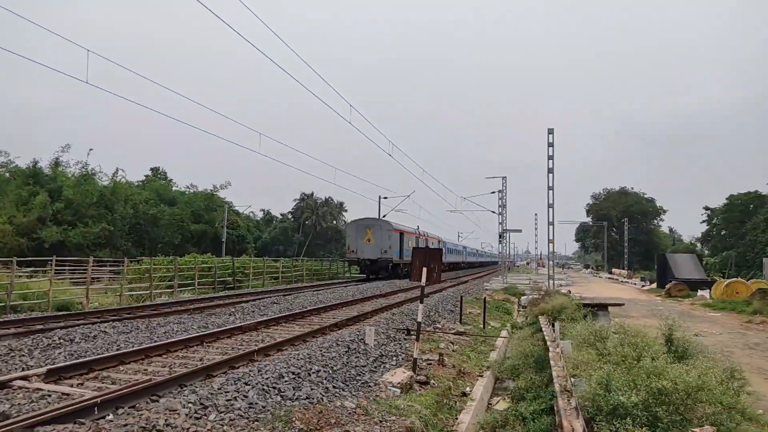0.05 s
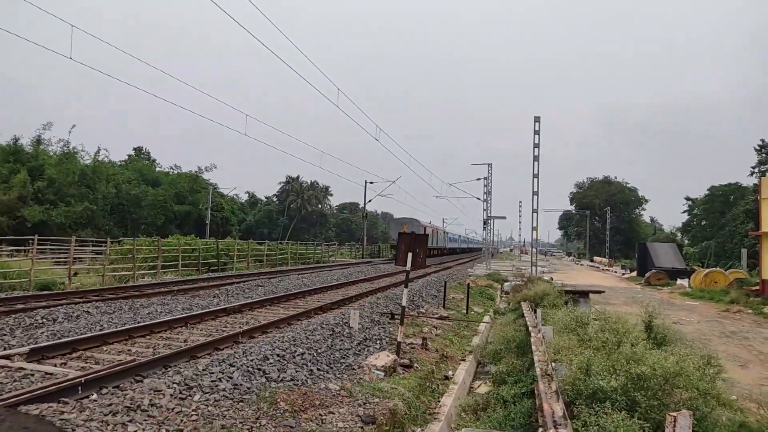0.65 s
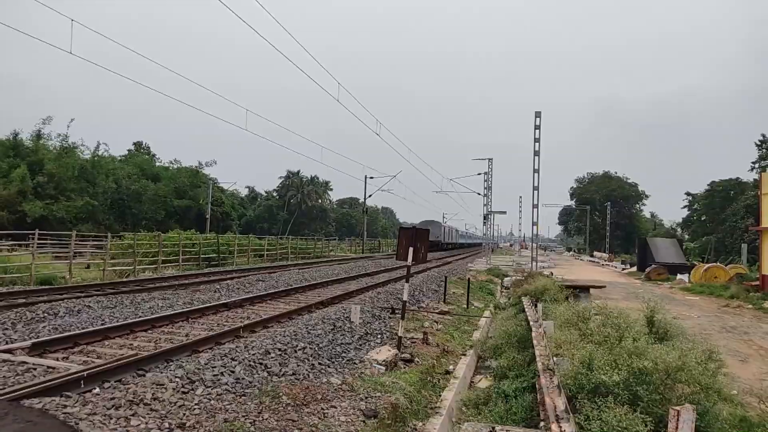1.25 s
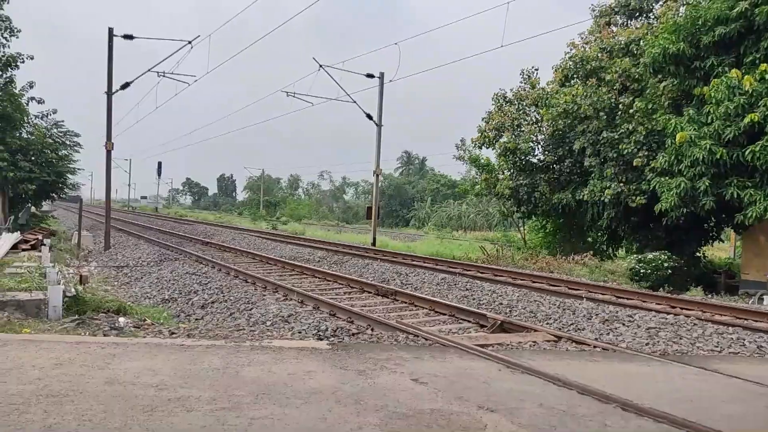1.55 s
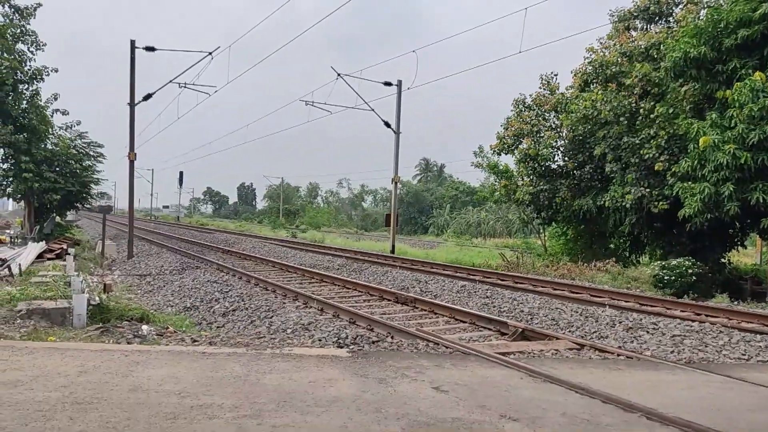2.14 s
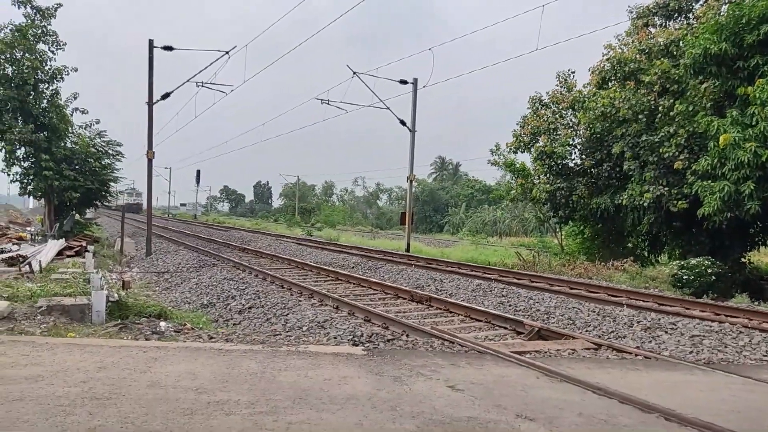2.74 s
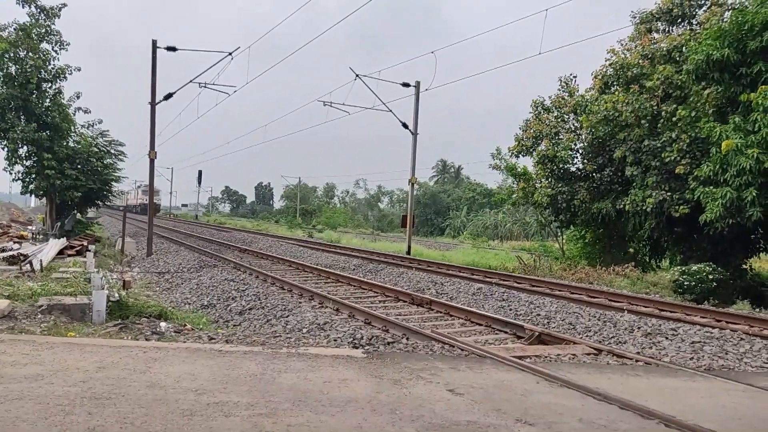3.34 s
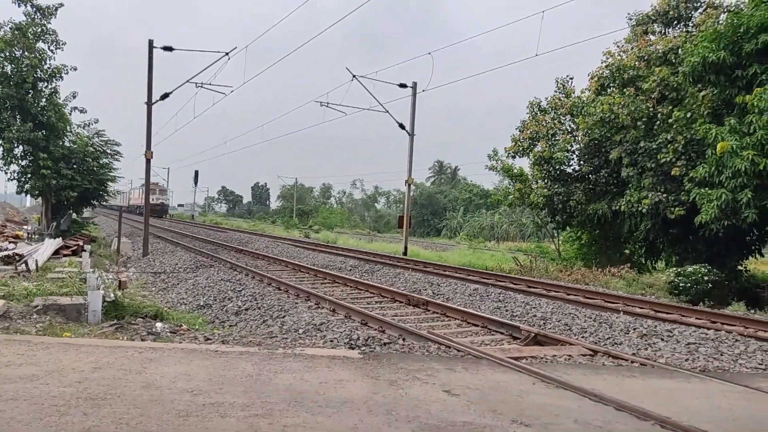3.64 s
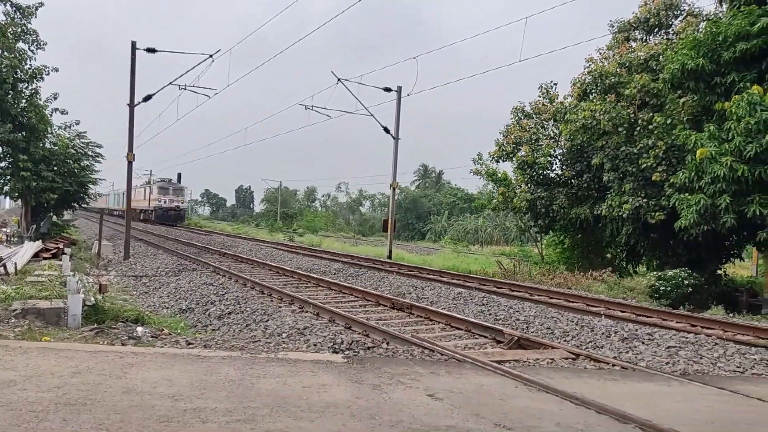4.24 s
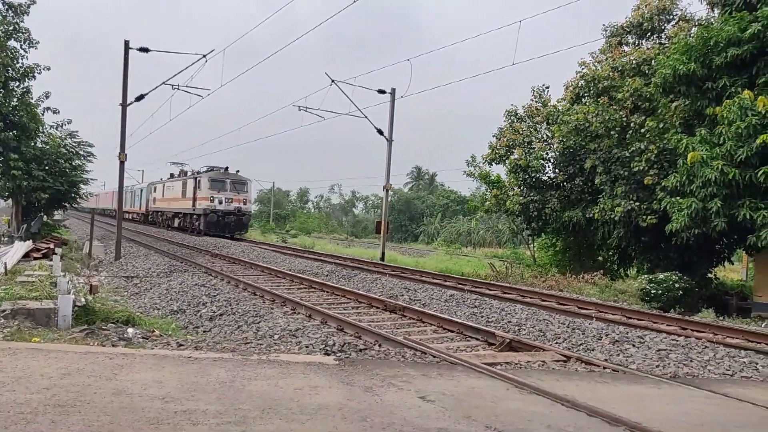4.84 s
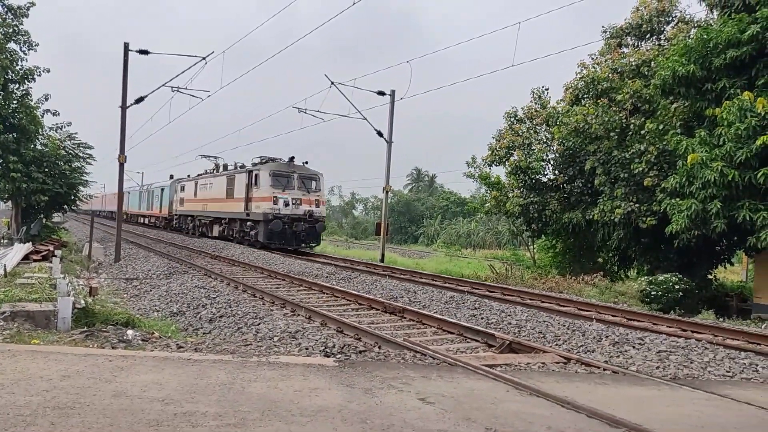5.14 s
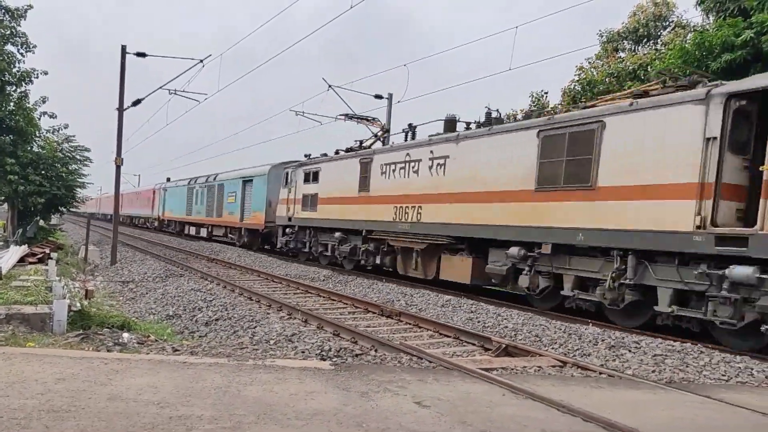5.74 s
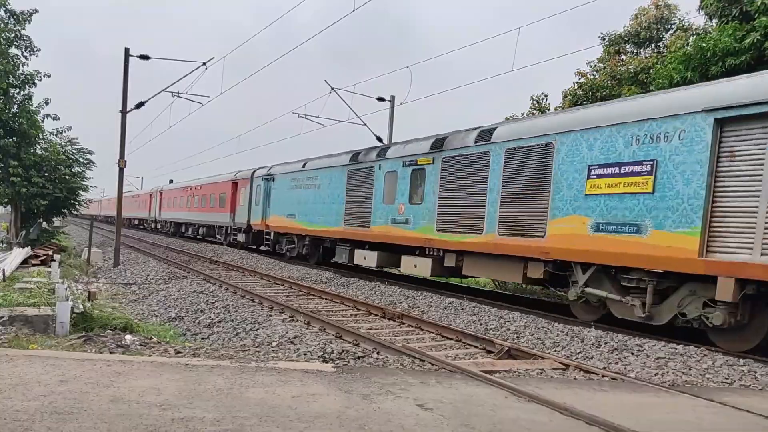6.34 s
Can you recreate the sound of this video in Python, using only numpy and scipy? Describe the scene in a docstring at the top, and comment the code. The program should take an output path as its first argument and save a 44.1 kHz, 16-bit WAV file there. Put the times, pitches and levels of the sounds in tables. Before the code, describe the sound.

Beside the tracks in open country, a phone microphone picks up the soft rolling of a departing train and a faint far horn. After an abrupt break, an oncoming locomotive blows a single bright horn note for about three seconds, swelling as it nears. The horn ends and the wheel noise builds to a loud roar, with a throbbing hum, whining gears and quick clattering over the crossing.

```python
"""An express train sounds one long horn blast, then roars and clatters past a level crossing.
Before it, another train rolls away under a faint far horn, and a short silence follows. Compressed air
drives each horn's diaphragm in a harmonic series; rough wheels force the ground, track and rails into
resonance. The oncoming train's speed and distance set its level, direction and Doppler shift.
The sound is heard through the two microphone ports of a phone."""
import sys
import numpy as np
from scipy import signal
from scipy.fft import rfft, irfft
from scipy.io import wavfile
from scipy.ndimage import uniform_filter1d, minimum_filter1d, map_coordinates

SR = 44100
rng = np.random.default_rng(int(sys.argv[2]) if len(sys.argv) > 2 else 0)


def output_pcm(signal):
    """Save a mono or channel-first signal as 16-bit PCM at the path in sys.argv[1].

    Samples are clipped to [-1, 1] before scaling.
    """
    pcm = np.clip(np.atleast_2d(signal).T, -1, 1) * 32767
    wavfile.write(sys.argv[1], SR, np.round(pcm).astype(np.int16))


N = 281358
TIME = np.arange(N) / SR
FREQ = np.fft.rfftfreq(N, 1 / SR)
HOP = 128  # samples per step of the horns' control curves

# The leaving train's roll and hiss. Each row: frequency in Hz, relative spectral density in dB.
LEAVING_ROLL_SPECTRUM = [(25, 0.5), (52, 6), (90, -2.5), (130, -5), (220, -2), (320, -8.5), (550, -4.5),
                         (900, -6.5), (1250, -12.5), (1680, -7.5), (1850, -10.5), (2200, -9.5), (3000, -24),
                         (8000, -22)]
LEAVING_HISS_SPECTRUM = [(1200, -11), (2500, 4), (3200, 2), (4200, 8), (5500, -10.5), (7700, -17.5),
                         (10000, -3), (12000, -46), (15000, -24)]
# The far horn fades and swells over its long path.
# Each row: time in seconds, levels of harmonics 2, 3, 4 and 5 in dB.
FAR_HORN_HARMONICS = [(0, -45, -49, -48, -44), (.16, -38, -44, -53, -40), (.3, -56, -45, -58, -47),
                      (.42, -51, -58, -58, -40), (.5, -59, -42, -58, -49), (.6, -56, -34, -49, -40.5),
                      (.72, -39, -44.5, -41.5, -51), (.88, -57, -41.5, -44, -55), (1.0, -43, -49, -40, -53),
                      (1.1, -43, -47, -49, -46), (1.2, -39.5, -45, -51, -43), (1.35, -40, -40, -55, -38.5),
                      (1.5, -49, -40.5, -49, -52)]
# The open air's rumble. Each row: frequency in Hz, relative spectral density in dB.
OPEN_AIR_SPECTRUM = [(20, 9.5), (55, -4.5), (90, -9), (160, 1), (260, -38), (450, -25), (900, -29.5)]
# Brief swells of that rumble. Each row: peak time in seconds, half-width in seconds, level in dB.
RUMBLE_SWELLS = [(1.76, .04, -52), (2.07, 0.085, -42), (2.87, 0.055, -45), (3.05, 0.043, -48),
                 (3.55, .04, -48.5)]
# The swells' two bands. Each row: centre in Hz, width in Hz, relative gain in dB.
RUMBLE_BANDS = [(68, 25, 0), (150, 40, -5)]
# The near horn's note. Each row: time in seconds, pitch in Hz.
HORN_NOTE = [(1.56, 361.7), (1.65, 357.6), (1.8, 357.1), (2.1, 362.2), (2.31, 360.5), (3.3, 356.0),
             (3.48, 358.5), (3.7, 356.5), (4.38, 355.8)]
# Its harmonics at full blast. Each row: frequency in Hz, relative level in dB.
HORN_SPECTRUM = [(358, -12.5), (716, -9.5), (1074, -3.5), (1432, -11), (1790, -4), (2148, -18.5),
                 (2506, -14), (2864, -14.5), (3222, -22), (3580, -16), (3940, -22.5), (4280, -18),
                 (4640, -13), (5000, -18), (5350, -17.5), (5800, -21.5), (7900, -21), (11000, -21.5),
                 (15000, -24)]
# The blast as it carries through the air.
# Each row: time in seconds, relative levels of the body, the bite (2-6 kHz) and the treble in dB.
HORN_BANDS = [(1.56, -42, -40, -46), (1.58, -39, -35.5, -42), (1.68, -33, -35, -35.5),
              (1.95, -32.5, -37, -34), (1.98, -36.5, -39.5, -35), (2.17, -36, -40, -43.5),
              (2.39, -29.5, -37.5, -31), (2.58, -31, -30, -34), (2.64, -30.5, -30, -32),
              (2.8, -28.5, -28.5, -28.5), (2.95, -25.5, -30, -29.5), (3.12, -19, -23.5, -30.5),
              (3.17, -19.5, -26.5, -27), (3.23, -17.5, -24, -30.5), (3.4, -19, -25.5, -24.5),
              (3.59, -14.5, -19.5, -22), (3.84, -16.5, -28, -23), (3.97, -13.5, -25.5, -21),
              (4.11, -13.5, -23, -21), (4.39, -13.5, -18.5, -20), (4.5, -19, -23.5, -22)]
# The ground's reflection cancels and lifts harmonics 1 and 2; harmonic 3 surges at entry, then sags.
# Each row: time in seconds, relative level in dB.
HORN_FIRST = [(1.56, -40), (1.76, -39), (1.84, -54), (1.92, -37), (2.0, -48.5), (2.1, -39.5), (2.52, -38),
              (2.6, -46), (2.68, -35), (2.85, -37.5), (3.0, -30), (3.17, -28), (3.25, -39.5), (3.32, -28),
              (3.4, -34), (3.52, -26.5), (3.85, -24), (4.2, -15), (4.48, -15), (4.65, -17.5)]
HORN_SECOND = [(1.56, -36.5), (1.64, -37.5), (1.7, -42.5), (2.37, -33.5), (2.6, -34), (2.71, -41.5),
               (3.24, -27), (3.51, -26.5), (3.55, -20.5), (3.81, -24.5), (3.94, -18.5), (4.62, -18.5)]
HORN_THIRD = [(1.56, -35), (1.73, -28), (1.94, -39), (1.97, -41), (2.06, -39), (2.2, -43), (2.35, -34),
              (2.5, -31), (2.82, -29), (3.2, -17.5), (3.43, -22), (3.55, -15.5), (3.77, -16.5), (4.25, -10),
              (4.5, -18.5)]
# Compressed air leaving the horn. Each row: frequency in Hz, relative spectral density in dB.
RUSH_SPECTRUM = [(500, -52), (850, 12.5), (1250, -5), (1650, -39), (3000, -48), (6000, -38), (7900, 3),
                 (12000, -22)]
# Its surges and dips. Each row: peak time in seconds, half-width in seconds, level change in dB.
RUSH_GUSTS = [(3.66, 0.026, -3), (3.745, 0.021, 11), (3.98, 0.01, -4), (4.2, 0.053, 9)]
# Resonances driven by the wheels. Each row: centre in Hz, width in Hz, relative gain in dB.
GROUND_MODES = [(53.5, 19, 1.5), (32.2, 19, -7), (104, 13, -11.5), (150, 8.5, -7.5)]
TRACK_MODES = [(213, 28, -15), (290, 73, -3.5), (192, 29, 0), (320, 63, -3.5), (420, 42, -66)]
RAIL_MODES = [(755, 220, 11), (668, 200, 6), (910, 140, 4.5), (987, 94, -18), (1710, 53, -8)]
# The oncoming wheels' hiss. Each row: frequency in Hz, relative spectral density in dB.
WHEEL_HISS_SPECTRUM = [(500, -12), (1000, 3.5), (1250, -5.5), (1450, 1), (1850, 0.5), (2500, -4.5),
                       (4000, -6), (5500, -11), (7700, -10.5), (10000, -11), (15000, -15)]
# The ballast's reflection hollows out the rolling sound. Each row: frequency in Hz, gain in dB.
BALLAST_RESPONSE = [(370, -1.5), (450, -1.5), (550, -5), (640, -1.5), (720, 0)]
# The locomotive's drone and gear whine. Each row: time in seconds, level in dB.
DRONE_ENVELOPE = [(4.5, -47), (5.2, -40), (5.5, -29.5), (5.62, -32), (5.8, -21.5), (6.0, -22),
                  (6.38, -20.5)]
WHINE_ENVELOPE = [(4.7, -61), (5.0, -47), (5.2, -36), (5.38, -40), (5.48, -25.5), (5.6, -31), (5.69, -23),
                  (5.8, -26.5), (5.95, -18), (6.1, -27), (6.38, -27)]
# Axles striking the crossing. Each row: start in seconds, relative level in dB.
AXLE_BLOWS = [(5.47, -13), (5.599, -12), (5.682, -11), (5.747, -3.5), (5.811, -7), (5.866, -12),
              (5.936, -11), (5.958, -7), (6.056, -9), (6.122, -7.5), (6.16, -3), (6.205, -14),
              (6.253, -19.5), (6.306, -11)]
# Steel knocks in the running gear. Each row: start in seconds, level in dB.
STEEL_KNOCKS = [(5.812, -29), (5.885, -31), (5.918, -27), (5.938, -24), (5.951, -23), (5.99, -25),
                (6.02, -16), (6.054, -32), (6.262, -14), (6.324, -8)]
# Passing bogies. Each row: peak time in seconds, half-width in seconds, level in dB, ring pitch in Hz.
BOGIE_PASSES = [(5.93, 0.026, -19, 1850), (6.31, 0.069, -21, 1850)]
# The two ports' responses. Each row: frequency in Hz, gain in dB.
LEFT_RESPONSE = [(60, -3), (380, 3.5), (720, 3), (1200, 3), (4500, 1.3), (5800, 5), (6600, -9), (7700, -6),
                 (8600, -21), (10000, -24), (15000, -22.5)]
RIGHT_RESPONSE = [(60, -7.5), (380, 1.04), (720, 4), (1200, 2), (4500, -0.6), (6500, 6), (7700, 13),
                  (8600, 4.5), (10000, -12.5), (12000, -15), (15000, -19.5)]

LEAVING_END_S, HORN_ON_S, SPLICE_S, VALVE_SHUTS_S, HORN_OFF_S = 1.5, 1.549, 2.319, 4.525, 4.88
RELEASE_DB_PER_S, TREBLE_RELEASE_DB_PER_S, RELEASE_DB_PER_S2 = 51.5, 197, 327
SPEED_M_S, SOUND_M_S, TRACK_DISTANCE_M = 36, 343, 8
FRONT_PASSES_S, GEARS_PASS_S, WHEELS_PASS_S = 5.944, 6.03, 6.058


def undb(db):
    """Amplitude grows tenfold for every 20 dB."""
    return 10 ** (np.asarray(db) / 20)


def unit(x):
    """Normalisation to an rms of 1."""
    return x / np.sqrt(np.mean(x ** 2))


def curves(table):
    """Linear interpolation in time of each column after the first."""
    times, *columns = np.transpose(table)
    return [np.interp(TIME, times, column) for column in columns]


def bell(peak_s, half_width_s):
    """A Gaussian pulse, down to 1/e at one half-width from its peak."""
    return np.exp(-((TIME - peak_s) / half_width_s) ** 2)


def shape(points, hz=FREQ):
    """Gain of a spectral envelope, interpolated in dB over log frequency."""
    point_hz, db = np.transpose(points)
    return undb(np.interp(np.log(hz + 1), np.log(point_hz), db))


def resonances(modes):
    """Gain of steep-sided resonances, which add in power."""
    power = 0
    for hz, width, db in modes:
        detuning = (FREQ ** 2 - hz ** 2) / (1.85 * width * FREQ + 1e-9)
        power += (undb(db) / (1 + detuning ** 2)) ** 2
    return np.sqrt(power)


def filtered(x, response):
    """A linear filter multiplies the spectrum by its response."""
    return irfft(rfft(x) * response, N)


def noise(response):
    """Filtered white noise takes on the filter's spectrum; its rms is set to 1."""
    return unit(filtered(rng.standard_normal(N), response))


def walk(rate_hz):
    """Smoothed random values give a drift with a spread near 1."""
    points = rng.standard_normal(int(N / SR * rate_hz) + 3)
    joined = np.interp(TIME * rate_hz, np.arange(len(points)), points)
    return 1.065 * uniform_filter1d(joined, int(SR / rate_hz / 2))


def ports(x, lag):
    """A path difference makes the left port hear a source `lag` samples after the right."""
    n = np.arange(N)
    return np.array([map_coordinates(x, [n + side * lag / 2], order=3, mode="nearest")
                     for side in (-1, 1)])


def noise_field(lag, grit_db, port_spacing_s=0.00063):
    """Gritty direct noise plus a diffuse field, whose coherence between ports follows a sinc law."""
    white = rng.standard_normal(N)
    grains = np.minimum(rng.exponential(size=N // 64 + 1), 5)
    direct = unit(white * undb(grit_db * np.repeat(grains, 64)[:N]))
    coherence = np.sinc(2 * FREQ * port_spacing_s)
    mid, side = (filtered(rng.standard_normal(N), np.sqrt((1 + sign * coherence) / 2))
                 for sign in (1, -1))
    return unit(ports(direct, lag) + np.array([mid + side, mid - side]))


def passing(abreast_s):
    """Distance in metres and Doppler factor of a moving point that draws level at `abreast_s`."""
    ahead = SPEED_M_S * (abreast_s - TIME)
    distance = np.hypot(ahead, TRACK_DISTANCE_M)
    return distance, 1 / (1 - SPEED_M_S / SOUND_M_S * ahead / distance)


def nearest(abreast_s):
    """A long source closes in, then stays alongside: metres to the train's nearest part."""
    return np.where(TIME < abreast_s, passing(abreast_s)[0], TRACK_DISTANCE_M)


def leaving_train(lag, roll_fade_db_per_s=5, hiss_fade_db_per_s=4):
    """Wheel and rail roughness radiates broadband noise, which fades as the coaches recede."""
    wheels = noise_field(lag, grit_db=0.89)
    roll_db = -29.5 - roll_fade_db_per_s * TIME + 0.32 * walk(20)
    hiss_db = -40.5 - hiss_fade_db_per_s * TIME + 1.3 * walk(20)
    roll = unit(filtered(wheels, shape(LEAVING_ROLL_SPECTRUM))) * undb(roll_db)
    hiss = unit(filtered(wheels, shape(LEAVING_HISS_SPECTRUM))) * undb(hiss_db)
    leftward = undb([[1.1], [-1.1]])  # the track runs off on the left
    return leftward * roll + hiss


def turbulence(steps):
    """Moving air perturbs a wave: complex drift, smoothed over `steps` hops, partly shared by ports."""
    size = 3, len(TIME[::HOP])
    raw = rng.standard_normal(size) + 1j * rng.standard_normal(size)
    window = signal.windows.gaussian(6 * steps + 1, steps / 2)
    smooth = signal.fftconvolve(raw, window[None] / np.sqrt(np.sum(window ** 2)), mode="same")
    return smooth[0] + smooth[1:]


def horn(hz, lag, gain_at, shimmer_db, waver_rad, flutter, rasp, harmonics):
    """A periodic diaphragm radiates harmonics; moving air modulates the higher ones most."""
    phase = 2 * np.pi * np.cumsum(hz) / SR
    note_hz, t = np.median(hz), TIME[::HOP]
    unsteady = np.interp(t, [2.6, 3.7], [1.5, 1])  # more flutter from far off
    out = np.zeros((2, N))
    for k in range(1, harmonics + 1):
        unrest = min((k + 1) / 10, 1)
        slow = unrest * turbulence(steps=22)
        quick = np.sqrt(unrest) * flutter * unsteady * turbulence(steps=5)
        grain = np.interp(k, [1, 5, 6, 16, 22], [.25, .35, 1, 1, .8]) * rasp * turbulence(steps=2)
        air = undb(shimmer_db * slow.real) * np.exp(1j * waver_rad * slow.imag) * (1 + quick + grain)
        flare_phase = k * k / 24 - 3 * np.log(k)  # dispersion in the flare spreads the pulse
        port_phase = np.pi * k * note_hz * np.outer([-1, 1], lag[::HOP]) / SR
        partial = gain_at(k * note_hz) * air * np.exp(1j * (flare_phase + port_phase))
        carrier = np.exp(1j * k * phase)
        out += [(np.interp(TIME, t, port) * carrier).imag for port in partial]
    return np.sqrt(2) * out


def echoes(x, cutoff_hz, t60_s=0.3, build_s=0.21):
    """Scattering from trees, masts and ballast sends a dull, late copy to each port."""
    t = TIME[:SR]
    tail = rng.standard_normal((2, SR)) * undb(-60 * t / t60_s) * np.minimum(t / build_s, 1)
    tail /= np.sqrt(np.sum(tail ** 2, axis=1, keepdims=True))
    dull_tail = signal.sosfilt(signal.butter(1, cutoff_hz, fs=SR, output="sos"), tail)
    return signal.fftconvolve(x, dull_tail, axes=1)[:, :N]


def far_horn(lag, note_hz=335.3, faint_db=-51.5):
    """Propagation over a long path makes the harmonics of one held note fade and swell in turn."""
    harmonic_db = dict(enumerate(curves(FAR_HORN_HARMONICS), 2))

    def gain_at(hz):
        """Harmonics 2 to 5 vary in level; the rest stay faint."""
        return undb(harmonic_db.get(round(hz / note_hz), np.full(N, faint_db))[::HOP])

    tone = horn(note_hz + 0.22 * walk(13.1), lag, gain_at,
                shimmer_db=1.2, waver_rad=0.6, flutter=0.08, rasp=0, harmonics=7)
    return tone + undb(-4.5) * echoes(tone, cutoff_hz=3040)


def open_air(lag):
    """A partly diffuse field of low noise gives the open country a faint rumble with brief swells."""
    air = noise_field(lag, grit_db=0.93)
    steady = unit(filtered(air, shape(OPEN_AIR_SPECTRUM))) * undb(-47.5 + 1.3 * walk(13))
    swells = sum(undb(db) * bell(s, half_width) for s, half_width, db in RUMBLE_SWELLS)
    return steady + ports(noise(resonances(RUMBLE_BANDS)) * swells, lag)


def near_horn(doublings, lag, lift_from_s=4.39, lift_hz_per_s=27, linger_s=0.19):
    """Air pressure sustains the oscillation; as it drops, the pitch lifts and the treble dies first."""
    hz = curves(HORN_NOTE)[0] + lift_hz_per_s * np.maximum(TIME - lift_from_s, 0)
    hz *= 1 + .0006 * walk(35) + .04 * bell(SPLICE_S, .0009)  # one small jump, like an edit cut
    t, note_hz = TIME[::HOP], np.median(hz)
    full_blast = (TIME > 3.55) & (TIME < 4.45)
    controls = (*curves(HORN_BANDS), *curves(HORN_FIRST), *curves(HORN_SECOND), *curves(HORN_THIRD),
                doublings)
    # Each control is taken relative to its mean at full blast.
    body_db, bite_db, treble_db, *lowest_db, away = (c[::HOP] - c[full_blast].mean() for c in controls)

    def gain_at(f):
        """Harmonics 1 to 3 have their own envelopes, the rest follow the bands; each decays in turn."""
        k = round(f / note_hz)
        body = np.interp(f, [1800, 2150], [1, 0])
        treble = np.interp(f, [5100, 7100, 8900, 12700], [0, 1, 1.1, 1.4])
        upper_db = body * body_db + max(1 - body - treble, 0) * bite_db + treble * treble_db
        db = lowest_db[k - 1] if k <= len(lowest_db) else upper_db
        # Air absorbs the very top; it and the blare near 2.8 kHz come forward as the horn nears.
        absorption_db = np.interp(f, [9000, 11500], [0, 2.5]) * away
        blare_loss_db = np.interp(f, [2000, 2500, 3200, 3900], [0, 3.5, 3.5, 0]) * away
        dying_s = np.maximum(t - VALVE_SHUTS_S - linger_s * note_hz / f, 0)
        db_per_s = np.interp(f, [3300, 7000], [RELEASE_DB_PER_S, TREBLE_RELEASE_DB_PER_S])
        release_db = db_per_s * dying_s + RELEASE_DB_PER_S2 * dying_s ** 2
        return shape(HORN_SPECTRUM, f) * undb(-12 + db - absorption_db - blare_loss_db - release_db)

    blast = horn(hz, lag, gain_at, shimmer_db=1.3, waver_rad=0.45, flutter=0.06, rasp=.115, harmonics=43)
    blast += air_rush(np.interp(TIME, t, body_db), lag)
    blast *= np.clip((TIME - HORN_ON_S) / 0.0069, 0, 1) * np.clip((HORN_OFF_S - TIME) / 0.02, 0, 1)
    return blast + undb(-21) * echoes(blast, cutoff_hz=3000)


def air_rush(blast_db, lag, steepness=2.5):
    """Escaping air makes jet noise, which carries less far than the tone and so swells more steeply."""
    release_db = RELEASE_DB_PER_S * np.maximum(TIME - VALVE_SHUTS_S, 0)
    gust_db = sum(db * bell(s, half_width) for s, half_width, db in RUSH_GUSTS)
    level_db = -39 + steepness * blast_db - release_db + gust_db + 2.5 * walk(110)
    return ports(noise(shape(RUSH_SPECTRUM)) * undb(level_db), lag)


def splice_click(lag, centre_hz=1500, width_hz=700):
    """A brief pulse of band-limited noise is heard as a soft click, like an edit cut."""
    band = noise(resonances([(centre_hz, width_hz, 0)]))
    return ports(band * bell(SPLICE_S, .0015) * undb(-30), lag)


def rolling_wheels(doublings, lag):
    """Forced vibration: rough wheels hiss and drive the resonances of ground, track and rails."""
    wheels = noise_field(lag, grit_db=0.76)
    # Each layer has a level alongside, a loss per doubling of distance and a random flutter.
    ground_db = -21 - 6 * doublings + 1.1 * walk(8.1)
    track_db = -20.5 - 7.5 * doublings + 2.3 * walk(28)
    rail_db = -21.5 - 7 * doublings + 1.6 * walk(30)
    hiss_db = -18 - 7.5 * doublings + 1.6 * walk(70)
    ground = unit(filtered(wheels, resonances(GROUND_MODES))) * undb(ground_db)
    track = unit(filtered(wheels, resonances(TRACK_MODES))) * undb(track_db)
    ring = unit(filtered(wheels, resonances(RAIL_MODES)))
    # The rails ring over a long stretch, so they show only part of the Doppler shift.
    _, doppler = passing(GEARS_PASS_S)
    position = np.cumsum(doppler ** .2) % (N - 1)
    rail = np.array([np.interp(position, np.arange(N), port) for port in ring]) * undb(rail_db)
    # The hiss stays low under the horn and rises as the blast ends.
    dip_db = 52 * np.clip(1 - (TIME - VALVE_SHUTS_S) / 0.072, 0, 1)
    hiss = unit(filtered(wheels, shape(WHEEL_HISS_SPECTRUM))) * undb(hiss_db - dip_db)
    return ground + track + rail + hiss


def locomotive_drone(lag, note_hz=237, rise_db_per_s=25):
    """The locomotive and its generator car hum one low note; amplitude modulation makes it throb."""
    level_db, = curves(DRONE_ENVELOPE)
    phase = 2 * np.pi * np.cumsum(note_hz + 3 * walk(25)) / SR
    distant_loss_db = rise_db_per_s * np.maximum(DRONE_ENVELOPE[0][0] - TIME, 0)
    return ports(np.sqrt(2) * np.sin(phase) * undb(level_db - distant_loss_db + 2 * walk(22)), lag)


def gear_whine(lag, rest_hz=744, octave_db=-4):
    """The drive gears sing a rough note and its octave, which fall by the Doppler effect in passing."""
    level_db, = curves(WHINE_ENVELOPE)
    _, doppler = passing(GEARS_PASS_S)
    phase = 2 * np.pi * np.cumsum(rest_hz * doppler + 22 * walk(90)) / SR
    tone = np.sin(phase) + undb(octave_db) * np.sin(2 * phase)
    roughness = (.85 + .5 * walk(80)) * undb(walk(20))
    return ports(np.sqrt(2) * tone * roughness * undb(level_db), lag)


def axle_thumps(track_hz=246.5, rise_s=0.0063):
    """Each axle's impact sets the track into a damped oscillation of a few cycles."""
    blows = np.zeros(N)
    for (start, db), detune in zip(AXLE_BLOWS, rng.standard_normal(len(AXLE_BLOWS))):
        age = np.maximum(TIME - start, 0)
        envelope = age / rise_s * np.exp(1 - age / rise_s)
        ring = np.sin(2 * np.pi * track_hz * (1 + 0.033 * detune) * age)
        blows += undb(db - 3.5) * envelope * ring
    return blows


def steel_clacks(decay_s=0.0078):
    """Impacts of steel on steel radiate broadband bursts that decay exponentially."""
    envelope = sum(undb(db) * (TIME > start) * np.exp(-np.maximum(TIME - start, 0) / decay_s)
                   for start, db in STEEL_KNOCKS)
    return envelope * noise(shape(WHEEL_HISS_SPECTRUM))


def bogie_grind(width_hz=280):
    """Grinding excites a resonance of the wheels, which swells and fades as each bogie sweeps by."""
    return sum(noise(resonances([(hz, width_hz, 0)])) * undb(db) * bell(s, half_width)
               for s, half_width, db, hz in BOGIE_PASSES)


def scene():
    """The sources superpose: one train leaves, then the other swings across the ports as it nears."""
    leaving_lag, far_lag, near_lag = np.full(N, -4), -5.5, 24  # samples
    leaving = leaving_train(leaving_lag) + far_horn(leaving_lag)
    doublings = np.log2(nearest(FRONT_PASSES_S) / TRACK_DISTANCE_M)  # of distance; zero alongside
    lag = far_lag + (near_lag - far_lag) * TRACK_DISTANCE_M / nearest(WHEELS_PASS_S)
    blast = near_horn(doublings, lag)
    running = rolling_wheels(doublings, lag) + locomotive_drone(lag)
    running += ports(axle_thumps() + steel_clacks() + bogie_grind(), lag)
    running = filtered(running, shape(BALLAST_RESPONSE))
    oncoming = blast + running + gear_whine(lag) + open_air(lag) + splice_click(lag)
    return leaving * (TIME < LEAVING_END_S) + oncoming * (TIME > HORN_ON_S)


def record(dry, top_hz=15700):
    """The left port is dull, the right resonates in the treble; a limiter and a low-pass follow."""
    coloured = filtered(dry, np.array([shape(LEFT_RESPONSE), shape(RIGHT_RESPONSE)]))
    headroom = 1 / np.maximum(np.abs(coloured).max(axis=0), 1)
    gain = uniform_filter1d(minimum_filter1d(headroom, size=600), size=600)
    return signal.sosfilt(signal.ellip(10, .2, 80, top_hz, fs=SR, output="sos"), coloured * gain)


dry = scene()
out = record(dry)
output_pcm(out)
```